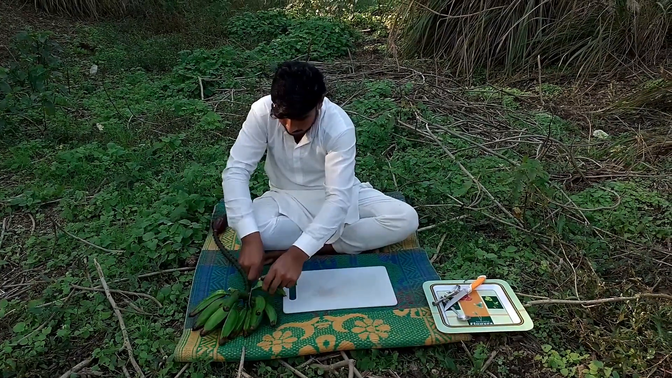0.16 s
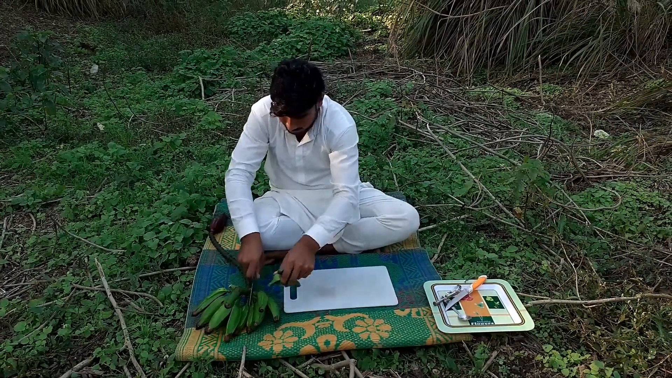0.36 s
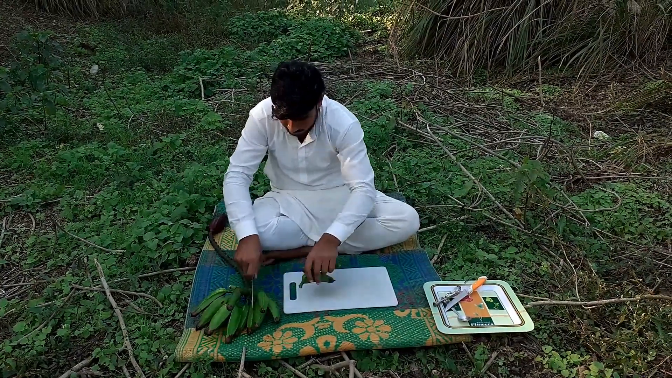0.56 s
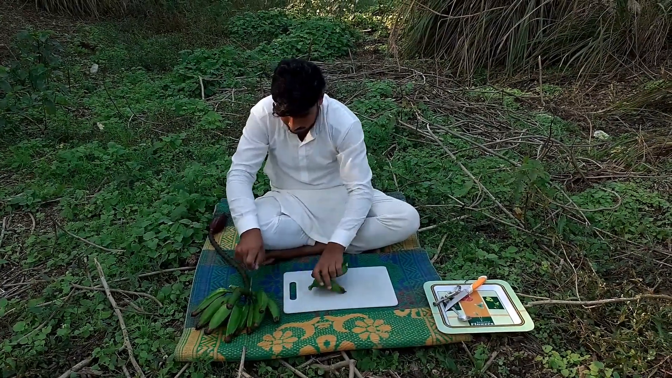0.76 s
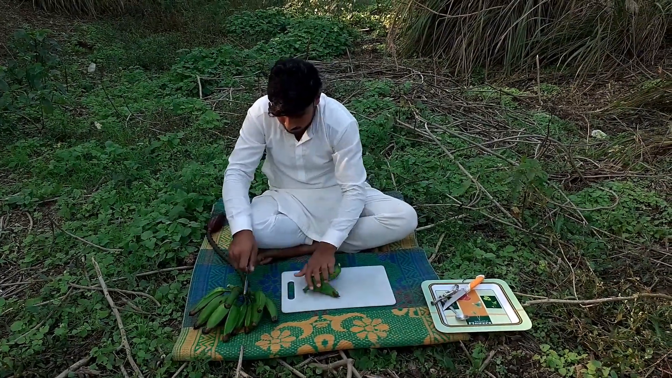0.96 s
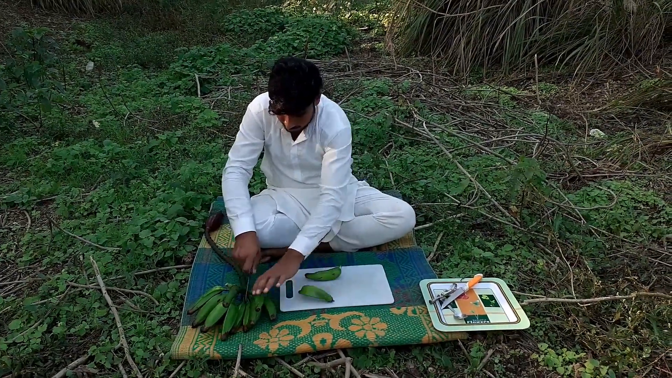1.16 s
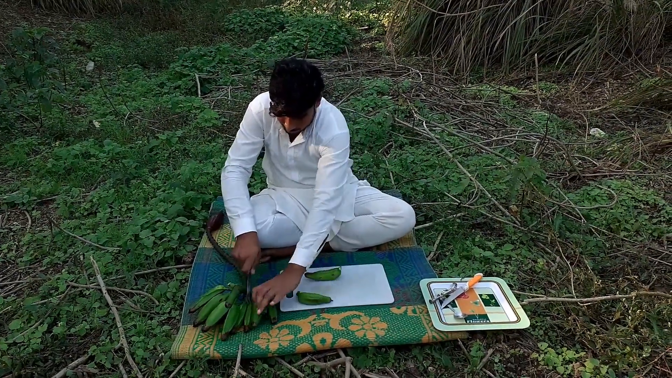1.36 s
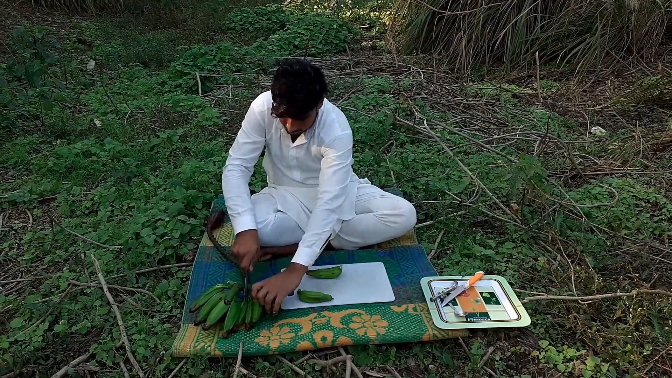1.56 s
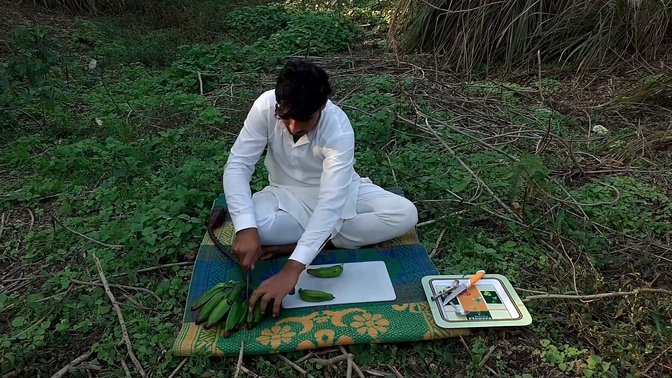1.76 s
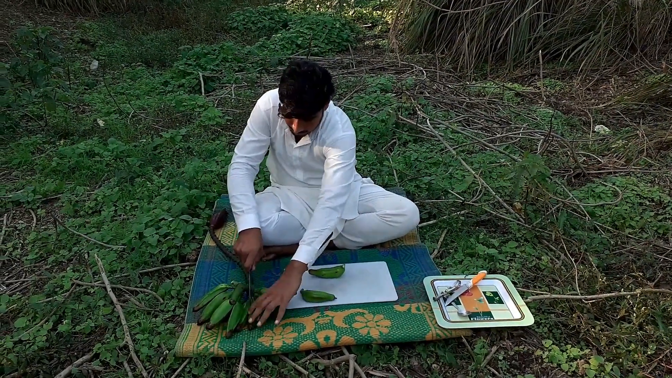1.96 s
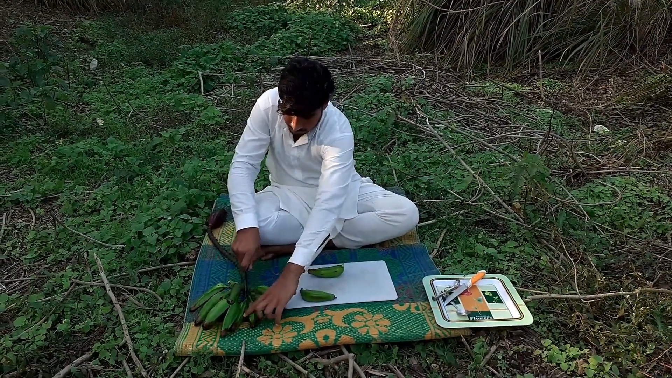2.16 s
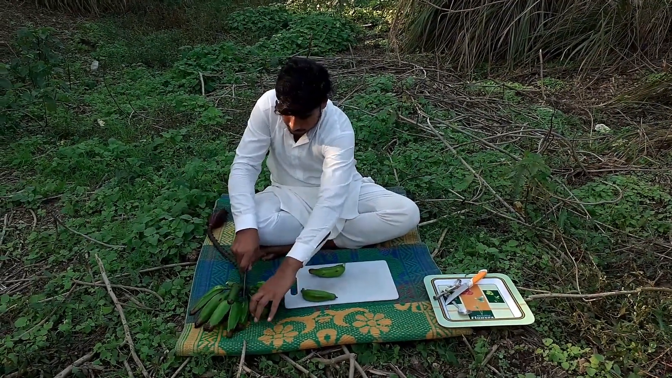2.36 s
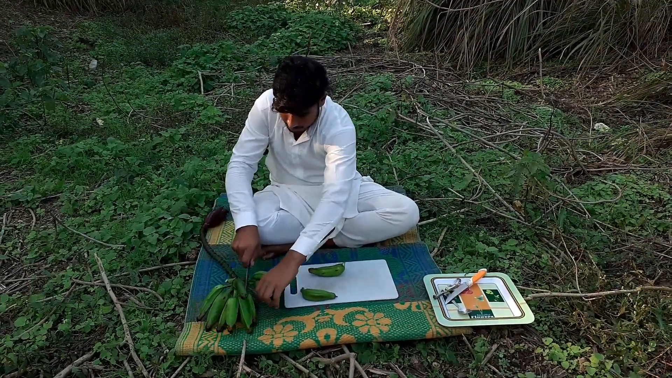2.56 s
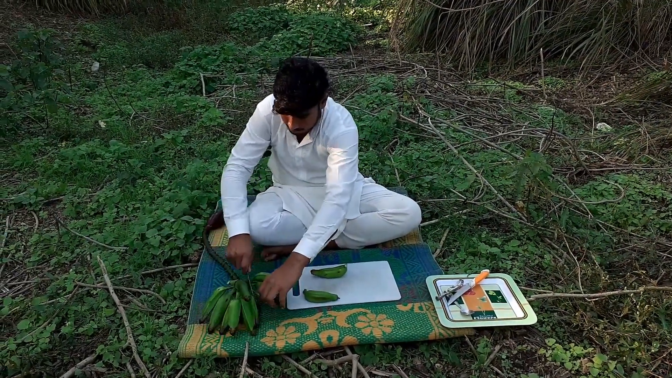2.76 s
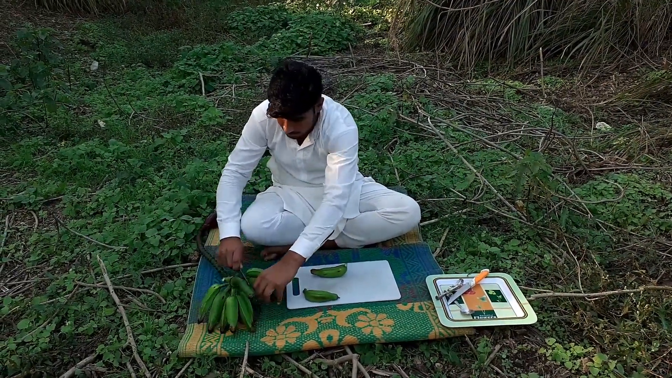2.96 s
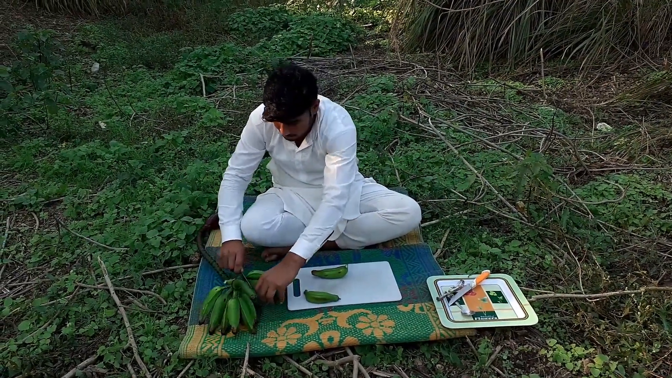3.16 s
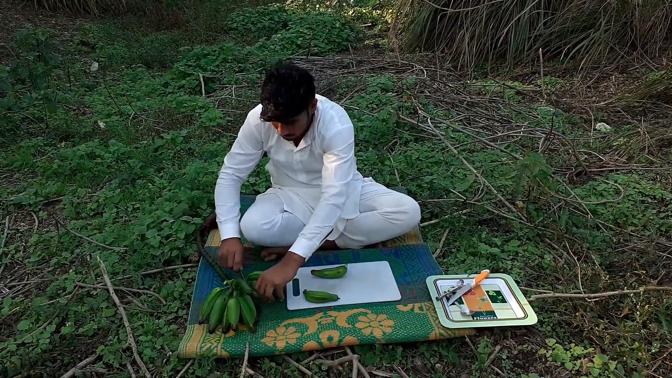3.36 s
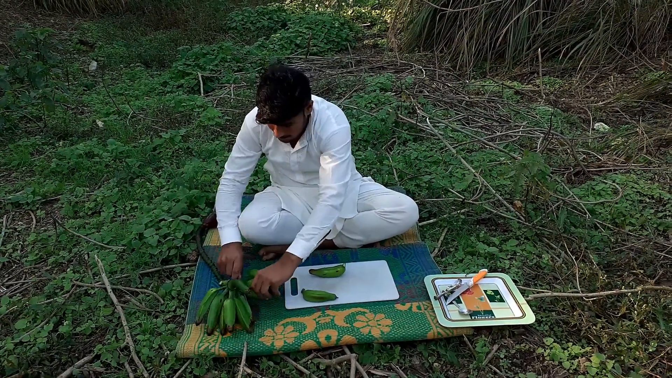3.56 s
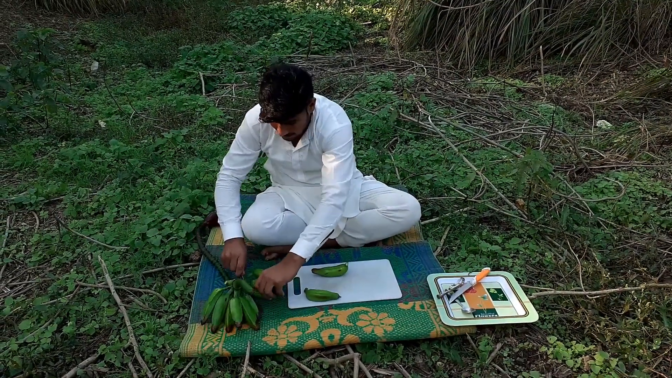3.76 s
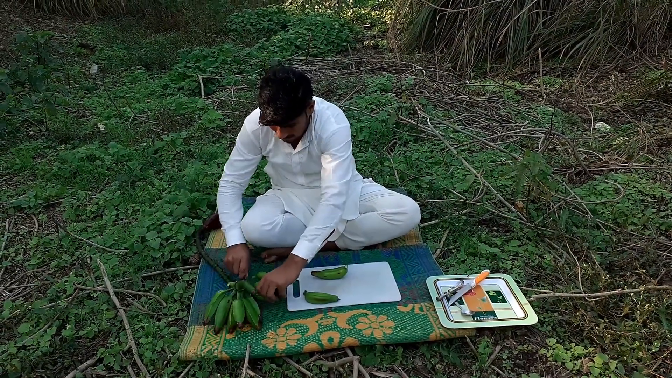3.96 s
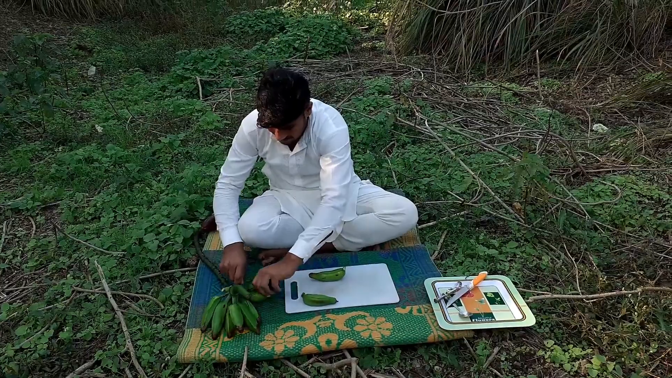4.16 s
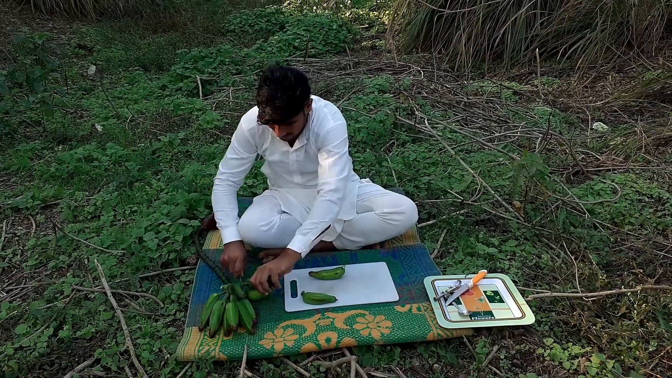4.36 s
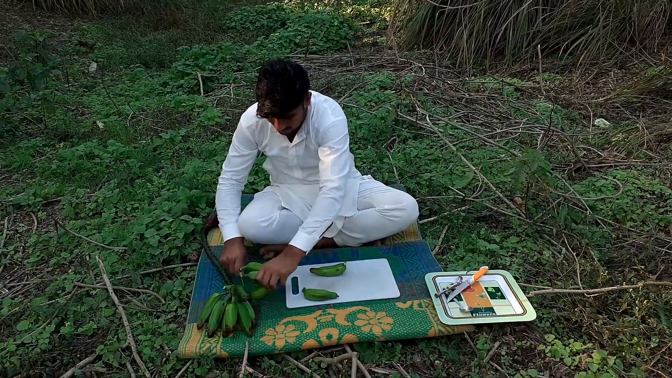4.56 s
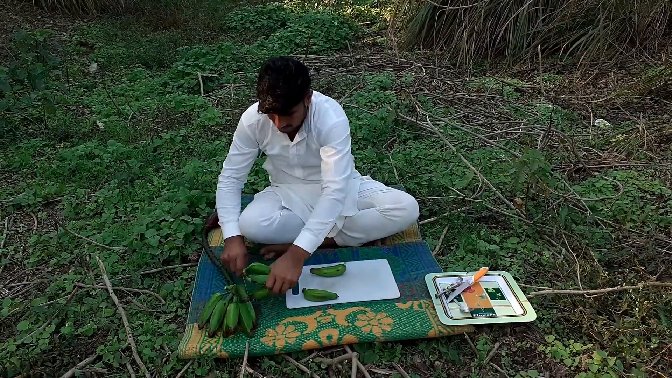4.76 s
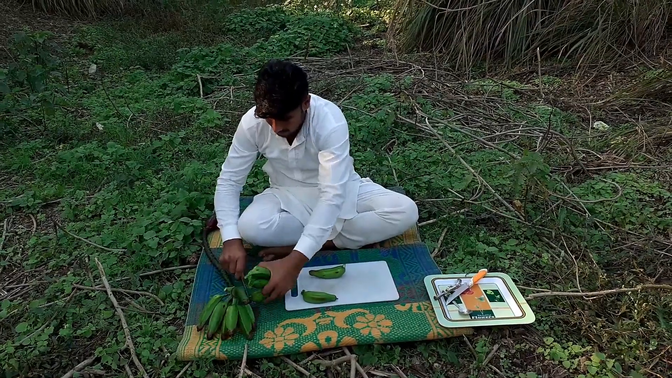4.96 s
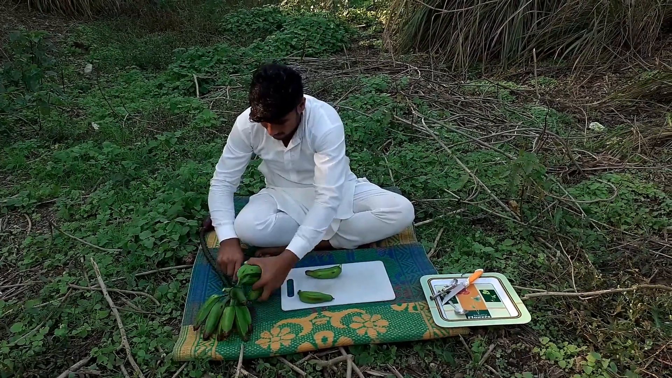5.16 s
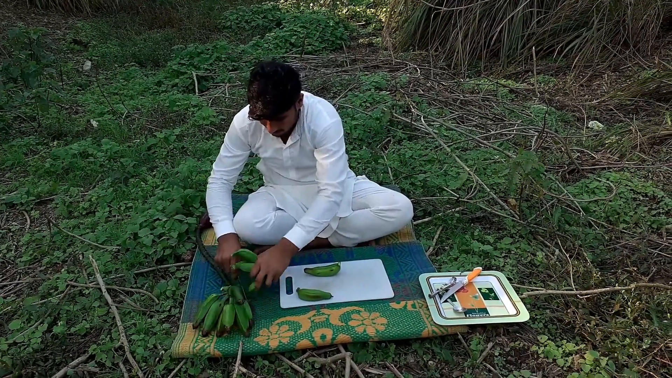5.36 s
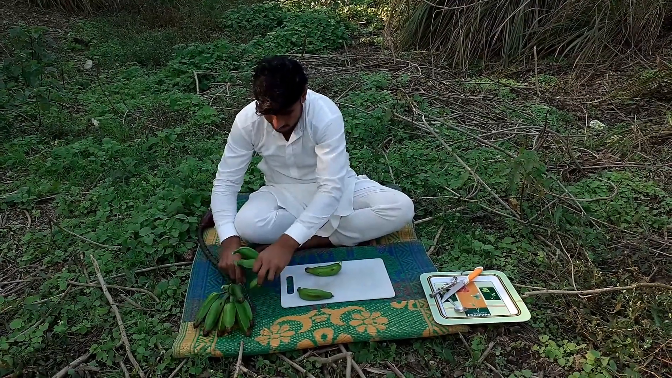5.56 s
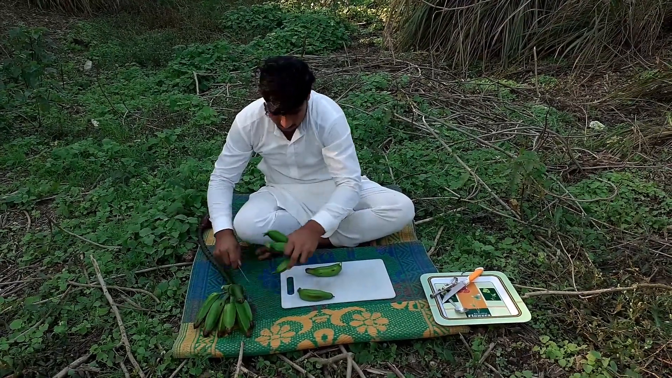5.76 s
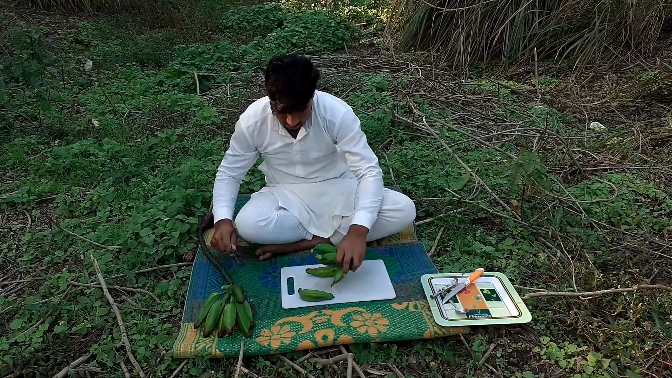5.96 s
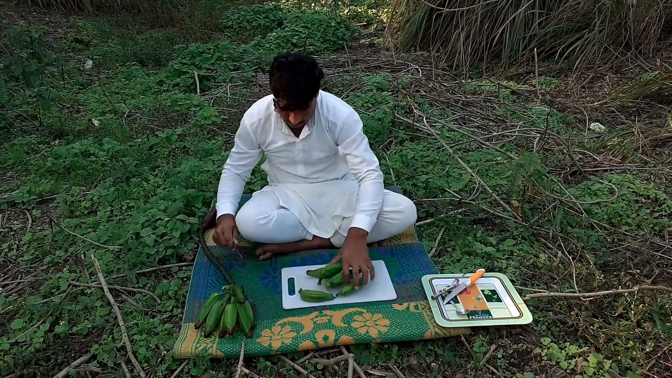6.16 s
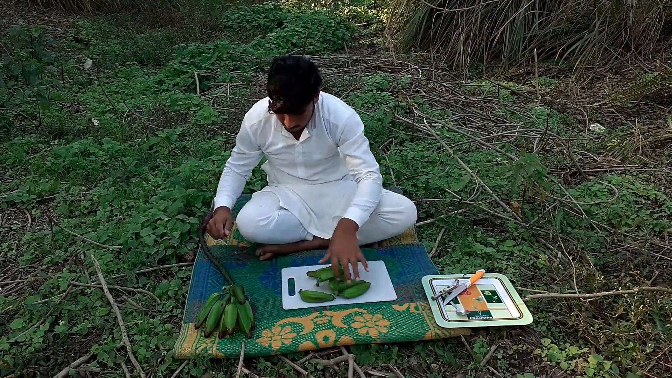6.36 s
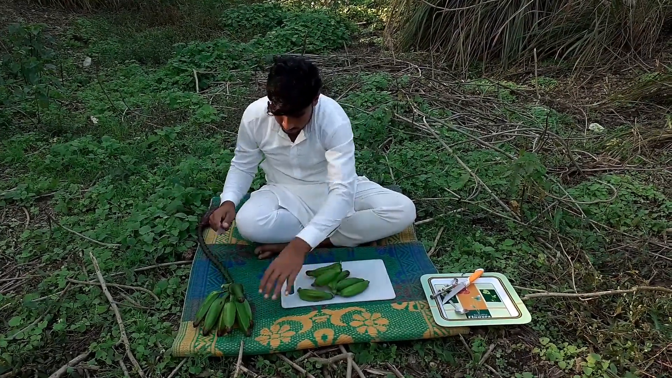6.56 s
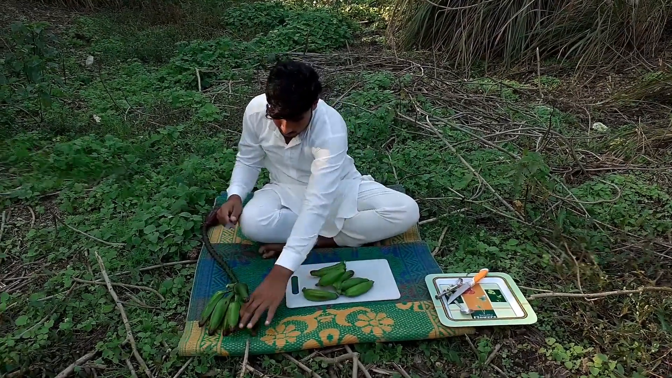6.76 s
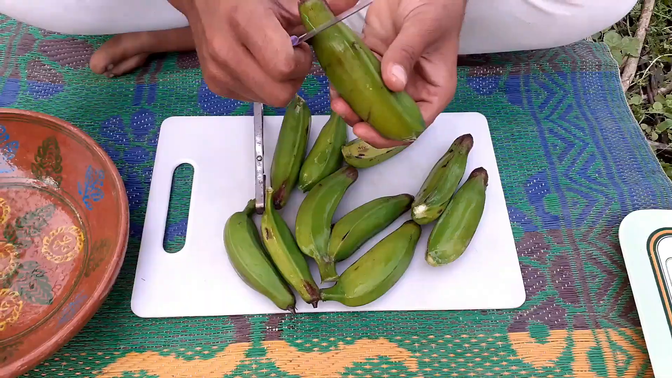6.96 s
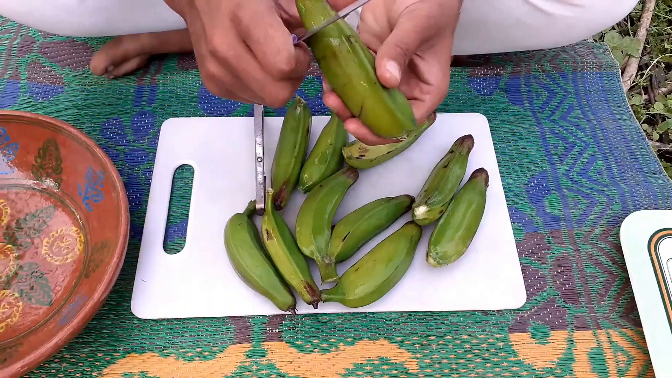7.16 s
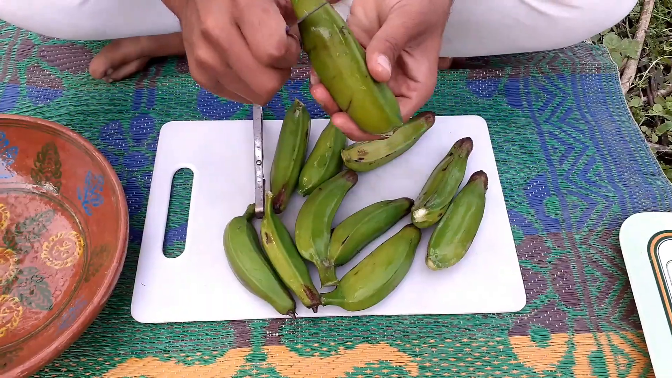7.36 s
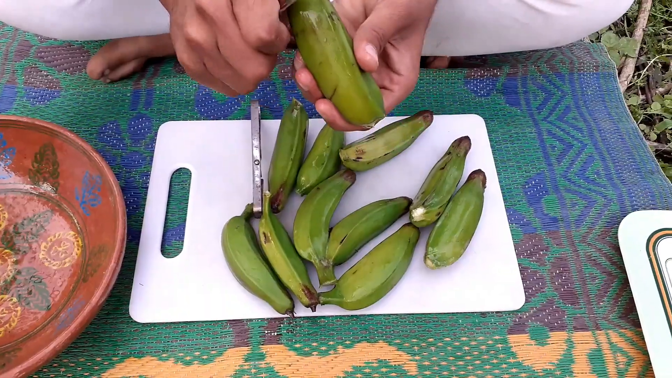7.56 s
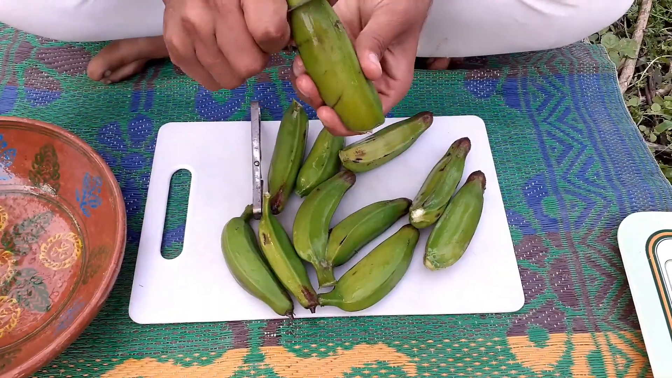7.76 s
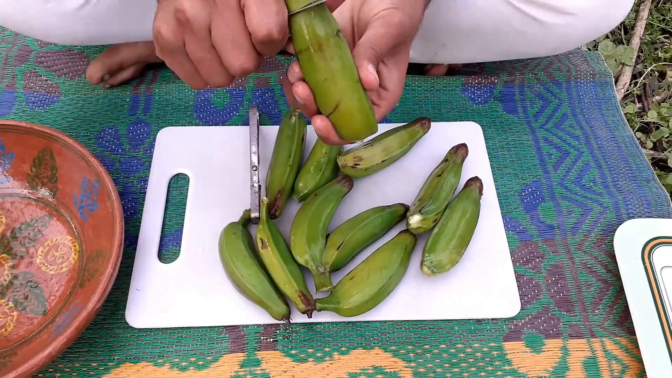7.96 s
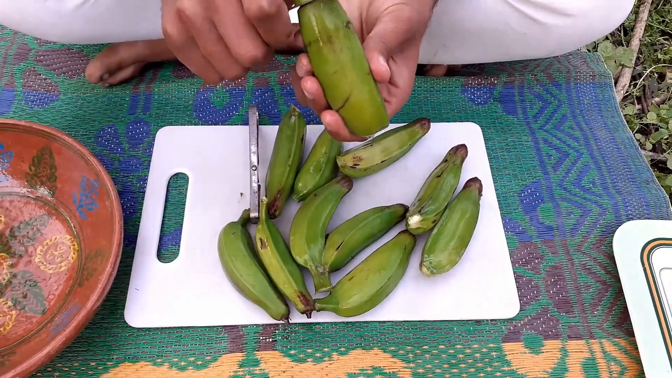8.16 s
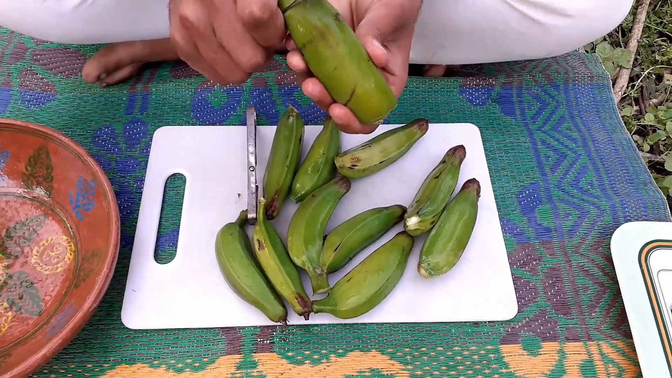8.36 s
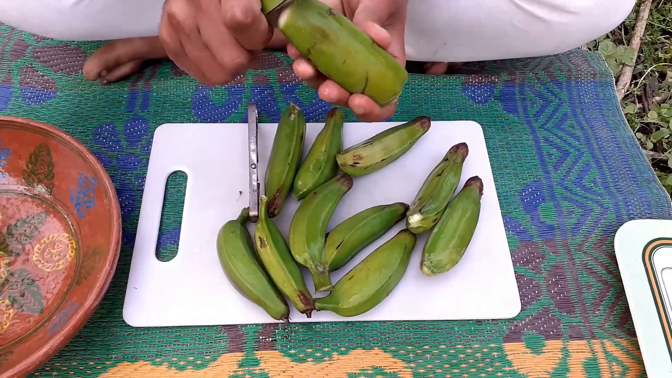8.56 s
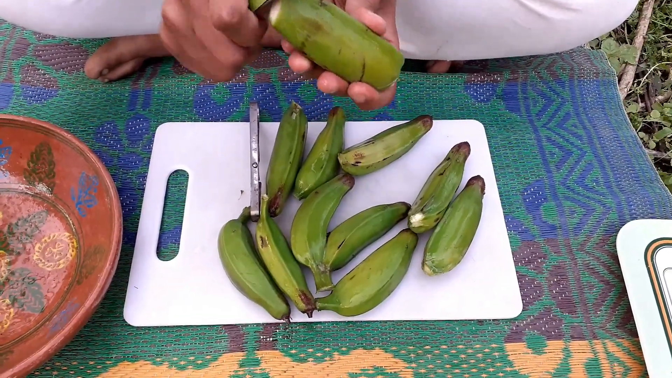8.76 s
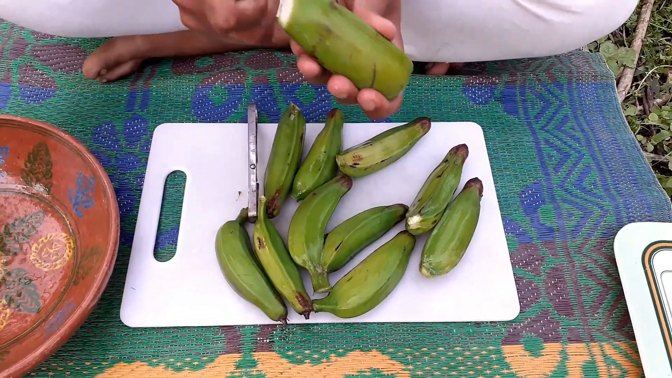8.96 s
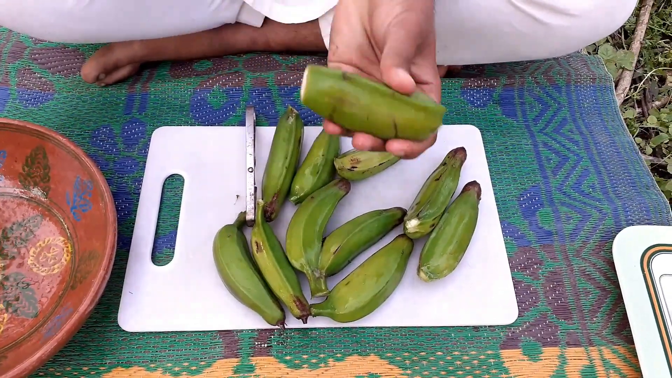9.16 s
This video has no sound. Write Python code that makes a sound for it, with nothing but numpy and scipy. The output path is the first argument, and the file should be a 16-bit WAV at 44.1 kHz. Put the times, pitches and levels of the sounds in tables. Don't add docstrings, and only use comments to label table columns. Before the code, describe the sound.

Open-air hiss and a wavering low engine hum run throughout, with a faint fuzzy drone fading by 3.5 s. A far crow is already calling as hands rustle and crackle the bunch. At 0.75-0.9 s a green banana thuds onto a plastic board, with a lighter knock at 1.2 s; small dull metal clinks follow. Faint caws come at 1.3 and 2.4-3 s. A nearer hoarse crow caws at 3.1, 3.7, 4.4, 5.2 and, brighter, 6.0 s, a falling distant call overlapping at 5.3. Stalks snap sharply at 3.5 and 4.3, a blade pings at 3.8, and fibres creak around 5-5.5. Fruit clatters down at 6.15-6.3. From 6.8 s the perspective is close: scrapes, a harsh stroke at 7.6, leafy rubbing, cracks and blade pings, higher loud caws at 7.7 and 8.3, a farther one at 8.5, crisp final cuts near 8.85, then two soft hollow taps around 9.1.

```python
import sys
import numpy as np
from scipy import signal
from scipy.fft import rfft, irfft
from scipy.io import wavfile
from scipy.ndimage import uniform_filter1d

SR = 44100
rng = np.random.default_rng(int(sys.argv[2]) if len(sys.argv) > 2 else 0)


def elevation(decibels):
    levels = np.asarray(decibels, float)
    return 10 ** (levels / 20)


def transcribe(u):
    v = np.clip(np.atleast_2d(u).T, -1, 1)
    q = np.round(v * 32767).astype(np.int16)
    wavfile.write(sys.argv[1], SR, q)


N = 405719
CLOSER_S = 6.84


def evened(x):
    return x / np.sqrt(np.mean(x ** 2) + 1e-20)


def read(points, hz):
    f, value = np.transpose(points)
    return np.interp(np.log(hz + 1), np.log(f + 1), value)


def curve(rows, t):
    s, *columns = np.transpose(rows)
    return [np.interp(t, s, c) for c in columns]


def add(mix, s, sound):
    at = round(s * SR)
    sound = sound[..., max(-at, 0):]
    part = mix[..., max(at, 0):][..., :sound.shape[-1]]
    part += sound[..., :part.shape[-1]]


def colour(x, points):
    hz = np.fft.rfftfreq(x.shape[-1], 1 / SR)
    return irfft(rfft(x) * elevation(read(points, hz)), x.shape[-1])


def drift(size, hz):
    return evened(signal.sosfilt(signal.butter(2, hz, fs=SR, output="sos"), rng.standard_normal(size)))


def ring(hz, db, t60, t):
    return elevation(db - 60 * t / t60) * np.sin(2 * np.pi * hz * t)


def place(x, pan_db, count=5):
    left, right = elevation(pan_db / 2), elevation(-pan_db / 2)
    return np.array([left * np.roll(x, -count), right * x]) * 2 / (left + right)


# pitch_hz, left_lead_rad, left_right_db
PORTS = [(0, 0, -4.5), (2900, 1.9, -3), (4600, 2.3, -5), (7000, 1.3, -1.5), (16500, 1.6, -1.5)]


def ports(x):
    lead, pan_db = curve(PORTS, np.fft.rfftfreq(len(x), 1 / SR))
    turn = np.exp(.5j * lead) * elevation(pan_db / 2)
    return irfft(rfft(x) * np.array([turn, 1 / turn]), len(x))


# pitch_hz, t60_s
FIELD_DECAY = [(500, 0.2), (2000, 0.44), (5000, 0.11), (12000, 0.017)]


def echoes(x):
    taps = rng.choice([-1., 1.], (2, SR // 2)) * (rng.random((2, SR // 2)) < .05)
    taps[:, :300] = 0
    hz, t, z = signal.stft(taps, SR, nperseg=256)
    fading = z * elevation(-60 * t / read(FIELD_DECAY, hz)[:, None])
    tail = signal.istft(fading, SR, nperseg=256)[1]
    return signal.fftconvolve(x[None], tail / np.linalg.norm(tail[0]), axes=1)[:, :N]


def scatter(x):
    taps = rng.standard_normal((2, 300)) * elevation(-60 * np.arange(300) / SR / 0.023)
    return signal.oaconvolve(x[None], taps / np.linalg.norm(taps[0]), axes=1)[:, :N]


# pitch_hz, level_db per Hz
AIR = [(20, -32), (46, -30), (75, 7.5), (120, -23.5), (190, -44), (300, -15.5), (870, -35.5), (1150, -36.5),
       (2700, -32.5), (3200, -35.5), (7700, -26), (8900, -28), (9700, -98), (16000, -55)]
# pitch_hz, likeness
SAME = [(60, 0.79), (130, 1), (300, 0.67), (700, 0.14), (1400, 0.1), (4000, 0.081), (15000, 0.079)]


def air():
    frames, hz = N // 512 + 5, np.fft.rfftfreq(2048, 1 / SR)
    a, b, c, d, patches = rng.standard_normal((frames, 1025, 5)).T
    patches = evened(uniform_filter1d(uniform_filter1d(patches, 24, 0), 10, 1))
    same, left = read(SAME, hz)[:, None], a + 1j * b
    right = same * left + np.sqrt(1 - same ** 2) * (c + 1j * d)
    z = np.array([left * elevation(-12.5), right])
    z *= elevation(read(AIR, hz)[:, None] + 2.2 * patches)
    power = elevation(2 * read(AIR, hz))
    level = np.sqrt(np.sum(power) / np.sum(power[7:]))
    return elevation(-66) * level * evened(signal.istft(z, nperseg=2048, noverlap=1536)[1][:, :N])


# time_s, level_db
HUM = [(0, -45.5), (.55, -48), (1.1, -45.5), (2, -46.5), (3.4, -51.5), (4, -48), (4.8, -53.5), (6, -47.5),
       (7.2, -45), (9.2, -48.5)]
# time_s, level_db
WHINE = [(0.0, -69.5), (0.71, -62), (3.3, -70.5)]
# pitch_hz, level_db
FAINT = [(128, -70), (261, -74.5)]


def engine():
    t = np.arange(N) / SR
    hum = np.sin(2 * np.pi * np.cumsum(72.9 + 0.84 * drift(N, 11.4)) / SR)
    hum *= elevation(curve(HUM, t)[0] + 2.0 + 1.77 * drift(N, 21))
    rumble_bands = [(70, -37), (100, 2.5), (140, -8.5), (200, -16.5), (330, -66)]  # Hz, dB
    rumble = evened(colour(rng.standard_normal(N), rumble_bands))
    rumble *= elevation(np.where(t < CLOSER_S, -69, -60) + 0.5)
    tones = np.zeros(N)
    for hz, db in FAINT:
        turns = np.cumsum(hz + 1.61 * drift(N, 3.0)) / SR
        tones += np.sin(2 * np.pi * turns) * elevation(db + 1.6 * drift(N, 1.0))
    drone_bands = [(600, -14.5), (715, -3.0), (765, -1.0), (820, -6.5), (950, -35.0)]  # Hz, dB
    drone = evened(colour(rng.standard_normal(N), drone_bands))
    drone *= elevation(curve(WHINE, t)[0]) * np.clip(3.6 - t, 0, 1)
    return place(hum + rumble + tones + drone, -5.0, count=6)


def caw(start, end, db, top_hz, arch, throat, rattle_hz, hoarse, high_db=0, dull_db=4):
    rise, fall = arch
    u = np.linspace(-1, 1, round((end - start) * SR))
    size = len(u)
    hz = top_hz / 4 * (1 - np.where(u < 0, rise * abs(u) ** 4, fall * abs(u) ** 2.2))
    depth = min(.01 + .04 * hoarse, .022)
    hoarse = np.clip(hoarse + 0.32 * u ** 4, 0, 1)
    shake = 2 * np.pi * np.cumsum(rattle_hz * (1 + .3 * drift(size, 30))) / SR
    turns = np.cumsum(hz * (1 + depth * np.sin(shake) + 0.008 * drift(size, 77))) / SR
    voice = np.zeros(size)
    for k in range(1, 11):
        wobble = drift(size, 138) + 1j * drift(size, 81)
        clear = (1 - hoarse) * (1 + .55 * np.cos(shake + .7 * k))
        strength = clear + hoarse * min(k / 3, 1) * wobble
        level_db = read(throat, k * hz) + high_db * (k > 7) - dull_db * max(k - 3, 0) * u ** 2
        voice += elevation(level_db) * (strength * np.exp(2j * np.pi * k * turns)).real
    return start, elevation(db - 19 * abs(u) ** 4) * evened(voice) * signal.windows.tukey(size, .1)


# start_s, end_s, level_db, fourth_harmonic_top_hz, closing_fall (0-1)
FAR_CAWS = [
    (-0.2, 0.242, -60, 1952, 0.03),
    (1.295, 1.47, -60.5, 1547, 0.24),
    (2.362, 2.487, -66.5, 1605, 0.14),
    (2.563, 3.045, -69, 1503, 0.01),
    (5.687, 5.76, -75, 1816, 0.027),
    (6.679, 6.818, -69.5, 1540, 0.16),
    (6.847, 7.112, -63, 1604, 0.3),
    (8.497, 8.788, -60.5, 1635, 0.34),
]
# start_s, end_s, level_db, fourth_harmonic_top_hz, high_partials_db as the head turns
NEAR_CAWS = [
    (3.146, 3.45, -45, 1870, 2),
    (3.728, 4.02, -43.5, 1860, 2),
    (4.447, 4.725, -44.5, 1885, 2),
    (5.18, 5.466, -45, 1865, 2),
    (5.995, 6.315, -45, 1870, 12),
]
# start_s, end_s, level_db, fourth_harmonic_top_hz
FALLING_CAW = (5.29, 5.7, -51, 1970)
# start_s, end_s, level_db, fourth_harmonic_top_hz
LOW_CAW = (3.48, 4, -63, 2039.5)
# start_s, end_s, level_db, fourth_harmonic_top_hz
HIGH_CAWS = [
    (7.686, 7.936, -39, 2043),
    (8.262, 8.501, -39.5, 2020),
]
# pitch_hz, level_db
FAR_THROAT = [(900, -40), (1300, -10), (1600, 0), (2000, -4), (2400, -15), (3000, -40)]
NEAR_THROAT = [(460, -34), (930, -8), (1400, -4), (1860, 0), (2300, -8), (3400, -44), (4250, -21),
               (5000, -36)]
FALLING_THROAT = [(1100, -34), (1500, -9), (1900, 0), (2400, -5), (2900, -30)]
LOW_THROAT = [(700, -30), (1000, 0), (1400, -25), (2000, -40)]
HIGH_THROAT = [(500, -46), (1000, -25), (1520, -2), (2050, 0), (2550, -13), (3100, -19), (5000, -22)]


def crows():
    near, high, far = np.zeros((3, N))
    high_arch = (.07, .06)
    for *row, fall in FAR_CAWS:
        add(far, *caw(*row, (0.05, fall), FAR_THROAT, 75, .42))
    for *row, high_db in NEAR_CAWS:
        add(near, *caw(*row, (.13, .13), NEAR_THROAT, 67, .37, high_db))
    add(far, *caw(*LOW_CAW, high_arch, LOW_THROAT, 75, .25))
    add(far, *caw(*FALLING_CAW, (.08, .51), FALLING_THROAT, 85, .17, dull_db=3))
    for row in HIGH_CAWS:
        add(high, *caw(*row, high_arch, HIGH_THROAT, 75, .42))
    direct = place(near, -3.5, count=3) + place(high, -6, count=4) + place(far, -4, count=2)
    wet = echoes(elevation(-12) * near + elevation(-17) * high + elevation(-14) * far)
    return direct + wet * elevation(np.array([[-2.1], [2.1]]))


# start_s, level_db
BRUSHES = [(0, -55), (.13, -55.5), (.3, -57.5), (.54, -66), (.85, -66.5), (1.25, -64.5), (2.06, -67.5),
           (2.22, -67), (2.52, -68), (2.83, -74), (4.83, -61), (4.92, -61), (5.08, -60), (5.33, -51.5),
           (5.56, -72), (5.735, -64.5), (5.96, -65), (6.11, -62.5), (6.98, -55.5), (7.35, -61),
           (7.765, -47), (8.41, -43.5)]
# start_s, hold_s, level_db
PULLS = [(1.724, 0.057, -65), (3.293, 0.09, -60.5), (3.442, 0.089, -53), (3.613, 0.34, -48),
         (3.915, 0.29, -52), (4.28, 0.058, -54), (4.456, .2, -58), (5.184, 0.29, -63), (7.05, 0.18, -65),
         (7.383, 0.16, -60), (7.616, 0.23, -52.5), (7.907, 0.36, -58.5), (8.288, 0.087, -47.5),
         (8.486, 0.27, -54.5), (8.87, 0.32, -62.5)]


def handling():
    t = np.arange(0, N, 64) / SR
    grip_db_per_s, let_go_db_per_s = 293, 137
    rustle = elevation(-74) + 0 * t
    for s, hold, db in PULLS + [(s, 0, db) for s, db in BRUSHES]:
        grip_db = grip_db_per_s * np.maximum(s - t, 0)
        let_go_db = let_go_db_per_s * np.maximum(t - s - hold, 0)
        rustle = np.hypot(rustle, elevation(db - grip_db - let_go_db))
    scuff = np.hypot(elevation(-68.5), elevation(-56) * (rustle / elevation(-44.0)) ** 0.87)
    scuff *= elevation(-6 * (t > CLOSER_S))
    for s, db, *_ in THUDS:
        scuff = np.hypot(scuff, (t > s) * elevation(db - 44.5 - 60 * abs(t - s)))
    return [np.interp(np.arange(N) / SR, t, gain) for gain in (rustle, scuff)]


# pitch_hz, level_db per Hz
RUSTLE = [(1200, -11), (2000, -5), (3500, 2), (5500, 3.5), (8200, 5.5), (9000, -1), (10200, -6.5),
          (15900, -16.5)]
# pitch_hz, level_db per Hz
SCUFF = [(120, 16.5), (300, 12), (700, 11.5), (1400, 5), (2600, -8), (4000, -97)]
# pitch_hz, level_db per Hz
FIZZ = [(8000, -34), (9500, -18), (10200, -6.5), (13000, 5), (15900, -0.5)]


def hands():
    rustle, scuff = handling()
    flicker = elevation(2.45 * drift(N, 25.4))
    crackle = rng.standard_normal((2, N)) * elevation(5.8 * np.minimum(rng.exponential(1, N), 3.2))
    crackle *= rng.random(N) < 900 / SR
    grain = evened(rng.standard_normal((2, N)) + 0.7 * evened(crackle)) * flicker
    both = evened(colour(grain, RUSTLE)) * rustle * elevation(6.5)
    both += evened(colour(grain, SCUFF)) * scuff * elevation(3.5)
    both += evened(colour(grain, FIZZ)) * elevation(-46) * (rustle / elevation(-45.5)) ** 1.035
    diffuse = np.array([both[1] * 0.38, np.roll(both[1], 999)])
    return ports(both[0]) * 0.53 + 0.76 * diffuse


# pitch_hz, level_db per Hz
SNAP = [(3000, 5.5), (4500, 6.5), (7200, 5), (8800, 8), (10200, -3), (12500, 1.5), (16000, -8)]


def stalk(burst, low_db):
    low = [(350, low_db - 20), (800, low_db + 8.0), (2500, low_db + 16.5)]
    return colour(np.roll(burst, 64), low + SNAP)


# start_s, peak_db
TICKS = [(0.109, -40), (0.281, -43), (0.821, -53), (1.244, -46), (2.813, -46), (3.272, -41.5),
         (3.4118, -48), (3.4243, -40), (3.433, -41), (3.4448, -41), (3.6064, -41), (4.0274, -48),
         (4.1606, -46), (4.174, -33.5), (4.2925, -20), (4.339, -36), (5.2983, -33), (5.437, -42),
         (8.559, -31), (8.6007, -31.5), (8.75, -36), (8.8164, -33), (8.855, -31), (9.1278, -50)]
# start_s, length_s, rms_db, low_part_db
SCRAPES = [
    (0.121, 0.12, -54, -6.5),
    (0.283, 0.052, -66, -25),
    (4.278, 0.039, -37, -17),
    (5.43, 0.036, -43.5, -5.5),
    (6.821, 0.039, -44.5, -16),
    (7.587, 0.015, -25.5, -17.5),
    (7.618, 0.021, -38.5, -12.5),
    (8.397, 0.035, -40, -16),
]
# start_s, peak_db, low_part_db, t60_s
SNAPS = [(0.125, -33, -29, 0.017), (0.139, -30, -14, 0.032), (1.2079, -38, -2, 0.012),
         (3.464, -34, -4, 0.02), (3.48, -12.5, -7.5, 0.0051), (3.494, -24.5, -4, 0.021),
         (3.9644, -31, -4, 0.035), (4.273, -30, -37, 0.024), (4.5958, -36, -10, 0.0099),
         (5.326, -30.5, -32, 0.023), (7.705, -28.5, -17, 0.017), (7.7164, -24, -27, 0.027),
         (7.757, -20, -16, 0.077), (7.868, -17, -8.5, 0.024), (8.2911, -24, -14, 0.029),
         (8.389, -25, -9, 0.025), (8.83, -20.5, -28, 0.0093), (8.8426, -15, -19, 0.01),
         (8.8664, -12, -13, 0.016)]
# start_s, peak_db
CREAKS = [(4.8094, -50), (4.8294, -45), (5.0469, -45), (5.0694, -45), (5.1642, -44), (5.1811, -49),
          (5.22, -49), (5.2335, -46), (5.265, -38), (5.28, -40), (5.3394, -42), (5.356, -39), (5.3807, -38),
          (5.3844, -48), (5.3921, -32), (5.4176, -55), (5.4176, -38), (5.455, -33), (5.5473, -47),
          (7.6779, -35), (7.7308, -26), (7.8002, -33), (7.8194, -36), (7.9533, -40), (8.4397, -26),
          (8.6418, -33)]
# pitch_hz, level_db, t60_s
LAST_CUT = [(884, -31, 0.02), (1636, -27, 0.018), (3050, -23, 0.015), (4450, -12, 0.017),
            (5800, -24, 0.014)]


def snaps():
    out, t = np.zeros(N), np.arange(2048) / SR
    ticks = [(s, db, -19.5, 0.016) for s, db in TICKS]
    creaks = [(s, db, -37, 0.0095) for s, db in CREAKS]
    for s, db, low_db, t60 in SNAPS + ticks + creaks:
        burst = rng.standard_normal(2048) * elevation(-60 * t / t60) * np.minimum(t / 0.0013, 1)
        crack = stalk(burst, min(low_db, -4))
        add(out, s - 64 / SR, elevation(db) * crack / abs(crack).max())
    add(out, 8.868, sum(ring(*mode, t) for mode in LAST_CUT) * np.minimum(t / 0.00059, 1))
    for s, length, db, low_db in SCRAPES:
        grains = rng.standard_normal(6000) * elevation(3.5 * drift(6000, 350))
        corners_s = [0, .003, .7 * length, length, length + .006]
        stroke = np.interp(np.arange(6000) / SR, corners_s, [0, 1, 1, .3, 0])
        add(out, s, elevation(db) * evened(stalk(grains, low_db)) * stroke)
    return out


# start_s, peak_db, centre_hz, t60_s
SKINS = [(0.143, -58, 1200, .03), (0.163, -48, 1300, .03), (0.298, -49.5, 1100, 0.054),
         (0.328, -46.5, 900, 0.041), (0.35, -49, 990, 0.038), (3.525, -47, 810, 0.08),
         (5.727, -37, 7060, 0.07), (6.031, -46, 3350, .02), (6.104, -45, 4200, .02),
         (6.165, -37, 4080, 0.036), (6.321, -45, 3040, .02)]


def skins():
    out, t = np.zeros(N), np.arange(2048) / SR
    for s, db, hz, t60 in SKINS:
        burst = np.roll(rng.standard_normal(2048) * elevation(-60 * t / t60), 64)
        band = [(hz / 4, -30), (hz / 3.6, -5), (hz, 0), (1.9 * hz, -8), (3 * hz, -30)]
        knock = colour(burst, band)
        add(out, s - 64 / SR, elevation(db) * knock / abs(knock).max())
    return out


# start_s, peak_db, higher_twin_share (0-1)
CLINKS = [(0.538, -62.5, 0.75), (0.8005, -53, 0.48), (0.934, -62, 0.5), (1.065, -61, 0), (1.1724, -54, 0.4),
          (1.34, -62, 0.47), (1.6104, -64, 0.58), (2.0317, -56, 0.48), (2.221, -65, 0.4),
          (2.48, -56.5, 0.43), (4.3326, -54.5, 0.47), (4.4073, -50, 0.37), (4.5106, -47.5, 0.2),
          (4.5468, -56, 0.1), (4.6057, -59, 0.3), (4.7605, -68, 0.45), (4.893, -60, 0.3),
          (5.087, -63, 0.37), (6.9, -70, 0.6), (6.9717, -73, 0.6), (7.001, -68.5, 0.5), (7.149, -66, 0.64),
          (7.22, -73, .3), (7.28, -72, .7), (7.0433, -61, 0.4), (2.8944, -52.5, 0.6), (7.5156, -65.5, 1),
          (7.899, -63.5, 0.95), (7.999, -62, 0.2), (8.06, -64.5, 0.3), (8.226, -55, 0.4), (8.544, -53, .5),
          (8.9, -64, 0.4), (9.041, -61, 0.4)]
# pitch_hz, level_db, t60_s
DULL_METAL = [(2687, 7, 0.12), (2764, 1, 0.4), (5250, 1, 0.36), (6730, 7, 0.32), (7585, -13, 0.28),
              (8500, 5, 0.3)]
# start_s, peak_db, top_ring_hz, low_ring_db
PINGS = [
    (3.842, -32.5, 8800, -22),
    (7.339, -40, 8640, -14.5),
    (8.1425, -47.5, 8600, -5.5),
    (8.2216, -36, 8640, -15.5),
]


def metal():
    out, t = np.zeros(N), np.arange(SR // 4) / SR
    for s, db, twin in CLINKS:
        upper_db = -22.5 if s < CLOSER_S else -8.5
        upper = elevation(upper_db + rng.uniform(0, 0.19, len(DULL_METAL) - 2))
        share = np.append([1 - twin, twin], upper)
        tap = sum(w * ring(*mode, t) for w, mode in zip(share, DULL_METAL))
        add(out, s, elevation(db + 2.5 + 4.0 * drift(len(t), 45)) * tap * np.minimum(t / .003, 1))
    t60 = 0.22
    for s, db, hz, low_db in PINGS:
        ping = ring(hz, 0, t60, t) + ring(3130, low_db, .55, t)
        ping += ring(1.163 * hz, -11 - 9 * (s < CLOSER_S), .7 * t60, t)
        for ratio, upper_db in [(1.33, -20), (1.42, -19), (1.79, -20)]:
            ping += ring(ratio * hz, upper_db, .4 * t60, t)
        add(out, s, elevation(db) * ping)
    return out


# start_s, peak_db, main_ring_hz, brightness_db per octave
THUDS = [(0.7424, -25, 141, 3.5), (0.804, -26.5, 190, 2), (0.8207, -13, 222, -3), (0.837, -34, 113, -1),
         (0.88, -35.5, 178, -5), (0.927, -33, 119, 2), (1.208, -26.5, 304, 7), (1.222, -30.5, 200, -1),
         (6.142, -14.5, 207, 3), (6.151, -19.5, 125, -7.5), (6.165, -20.5, 113, 1.5),
         (6.185, -22.5, 208, 0), (6.21, -46, 129, -14), (6.296, -37.5, 165, -11), (6.321, -29, 169, -0.2),
         (6.82, -33.5, 105, 6.5)]
# pitch_hz, level_db, t60_s
BOARD = [(113, -2.5, 0.21), (165, -6, 0.077), (232.5, 6, 0.08), (301, -4, 0.12), (343, 0, 0.1),
         (459, -7.5, 0.11), (551, 4.5, 0.046), (691, 0.5, 0.028), (933, -3, 0.035), (1100, -11, 0.028),
         (1314, -9, 0.015), (1780, -22, 0.011)]
# pitch_hz, level_db per Hz
PUFF = [(60, -39), (130, 2), (400, -9.5), (1000, -24), (2500, -46), (6000, -59)]
# start_s, peak_db, pitch_hz, t60_s
TAPS = [
    (9.045, -38.5, 295, 0.065),
    (9.114, -32.5, 296, 0.058),
]


def thuds():
    out, t = np.zeros(N), np.arange(8000) / SR
    sweep, sweep_s = 1.167, 0.0058
    bent_t = t + sweep * sweep_s * (1 - np.exp(-t / sweep_s))
    for s, db, hz, bright_db in THUDS:
        detune = rng.uniform(.96, 1.04, len(BOARD))
        body = np.zeros(len(t))
        for k, (f, mode_db, t60) in enumerate(BOARD):
            mode = ring(f * detune[k], mode_db + bright_db * np.log2(f / 300), t60, t)
            body += mode * (-1) ** k * (1 - np.exp(-t * f / 0.28))
        main = elevation(5.5 - 60 * t / 0.093) * np.sin(2 * np.pi * hz * bent_t)
        body -= main * np.minimum(t / 0.00069, 1)
        puff = colour(rng.standard_normal(len(t)), PUFF) * elevation(-60 * t / 0.09)
        puff *= np.minimum(t / 0.00054, 1)
        add(out, s, elevation(db) * (body / abs(body).max() + elevation(-5) * puff / abs(puff).max()))
    for s, db, hz, t60 in TAPS:
        add(out, s, ring(hz, db, t60, t) * np.minimum(t / 0.0023, 1))
    return out


def scene():
    cracks, clinks = snaps() + skins(), metal()
    knocks = signal.sosfilt(signal.butter(2, 60, "high", fs=SR, output="sos"), thuds())
    near = ports(cracks + knocks) + place(clinks, -11)
    near += elevation(-8) * scatter(cracks)
    wet = echoes(elevation(-28) * cracks + elevation(-19.5) * knocks + elevation(-4) * clinks)
    return air() + engine() + crows() + hands() + near + wet


def low_pass(x):
    return signal.sosfilt(signal.butter(12, 16960, fs=SR, output="sos"), x)


def record(dry):
    lowpass = signal.firwin(511, 16000, window=("kaiser", 6), fs=SR)
    limited = signal.oaconvolve(dry, lowpass[None], "same")
    return low_pass(limited)


dry = scene()
out = record(dry)
transcribe(out)
```